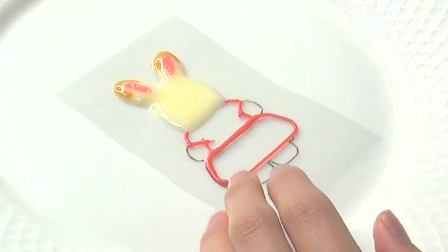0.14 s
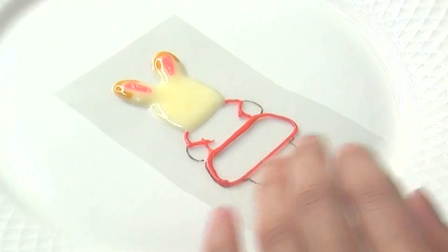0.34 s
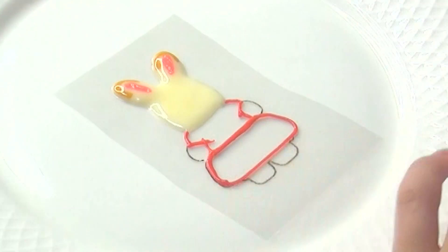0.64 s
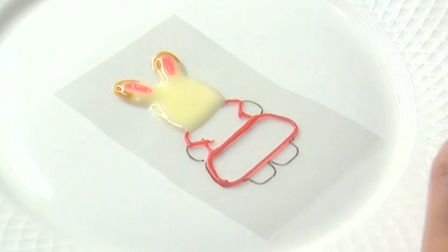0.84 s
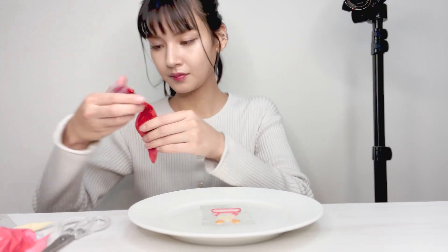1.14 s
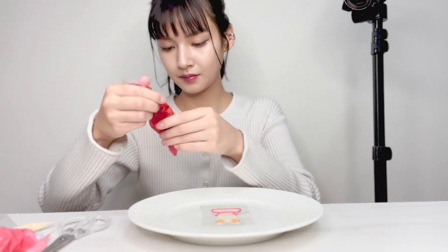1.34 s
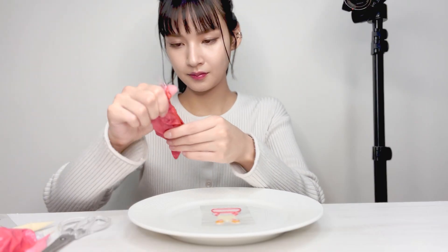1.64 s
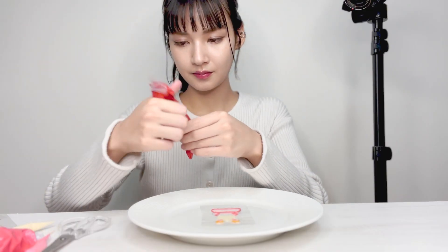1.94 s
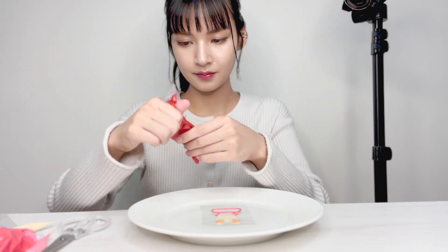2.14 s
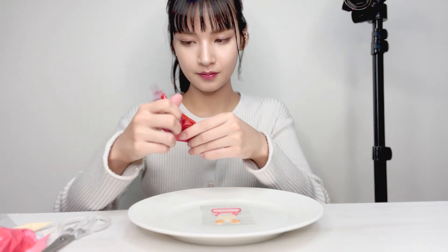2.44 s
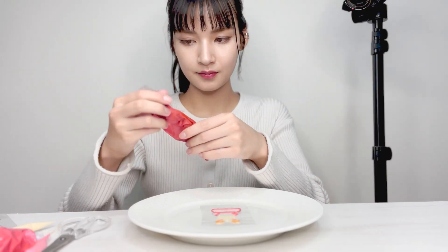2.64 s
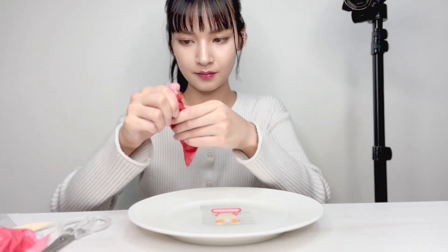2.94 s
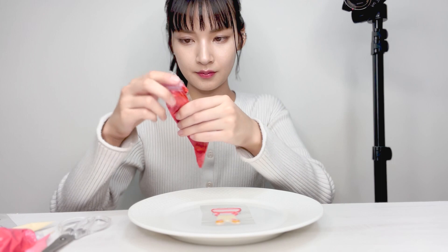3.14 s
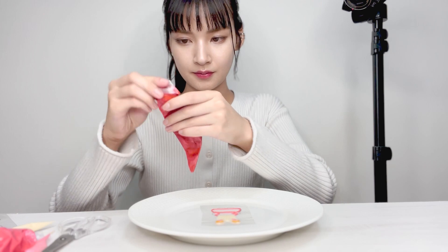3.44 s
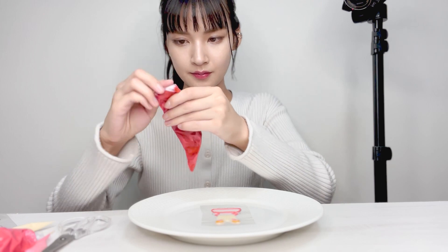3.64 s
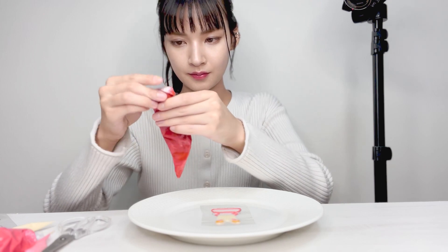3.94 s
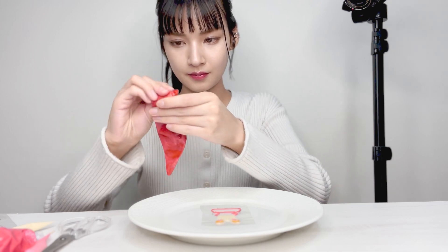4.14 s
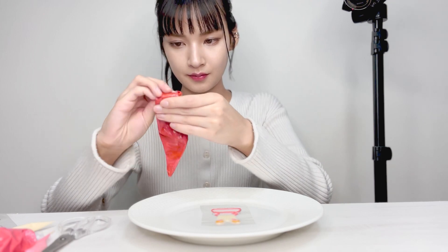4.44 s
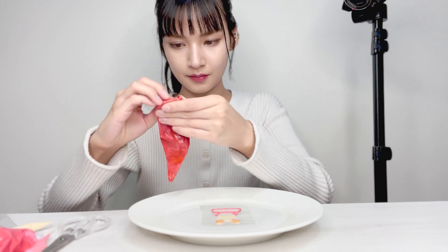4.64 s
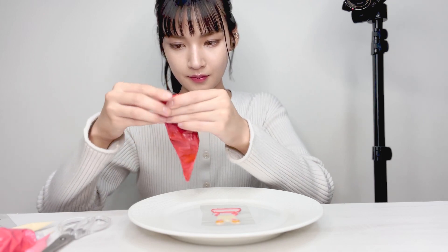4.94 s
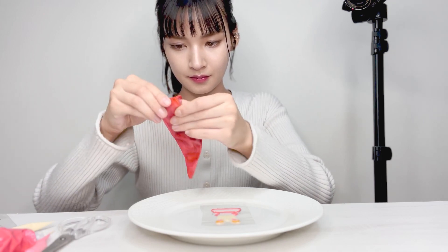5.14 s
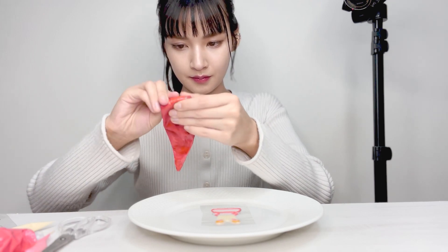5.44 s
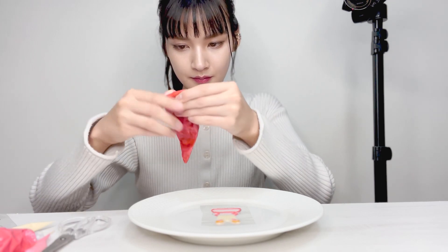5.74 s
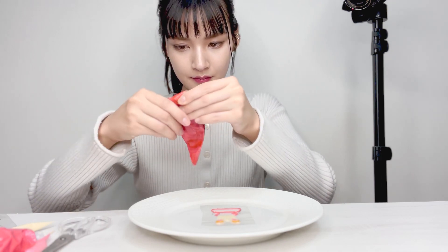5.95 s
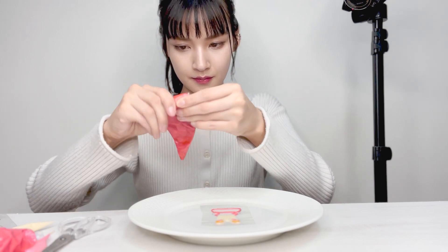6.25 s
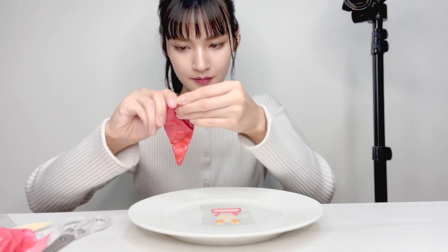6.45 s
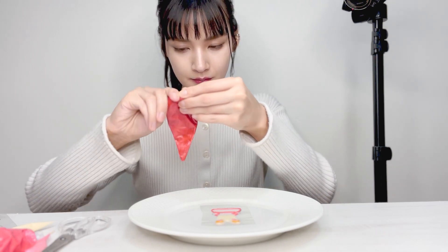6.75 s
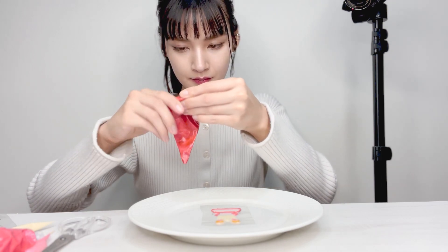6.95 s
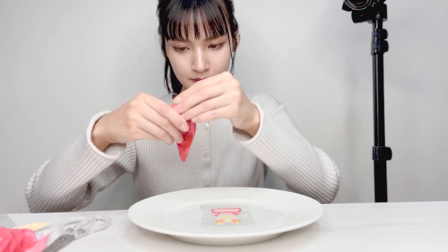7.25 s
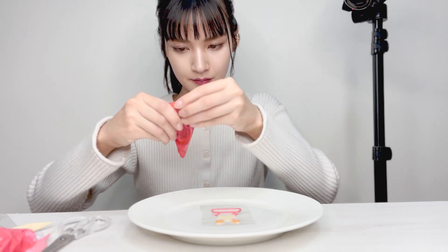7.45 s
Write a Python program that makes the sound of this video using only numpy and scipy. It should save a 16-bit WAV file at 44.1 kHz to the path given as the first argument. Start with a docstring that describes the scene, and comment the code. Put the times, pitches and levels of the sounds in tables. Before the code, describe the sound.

Hands twist and squeeze a filled plastic icing bag, its crisp, irregular crackles growing fainter over low room hum and hiss.

```python
"""A small, quiet room, a microphone pair near a table; hum and hiss lie under everything.
First an arm bumps the table, a sleeve rubs and a short low tone shudders. From about one second, hands
twist and squeeze a thin plastic piping bag above the table: creases in the film snap one by one over a
finer crackle, and the room answers each snap with a soft tail. The soft filling knocks dully now and
then. Over the last two seconds the snaps grow fainter."""
import sys
import numpy as np
from scipy import signal
from scipy.fft import rfft, irfft, next_fast_len
from scipy.io import wavfile

SR = 44100
rng = np.random.default_rng(int(sys.argv[2]) if len(sys.argv) > 2 else 0)


def pcm_store(signal):
    """Save signal as 16-bit PCM."""
    levels = np.round(np.clip(np.atleast_2d(signal), -1, 1) * 32767)
    wavfile.write(sys.argv[1], SR, levels.astype(np.int16).T)


N = 335071
SIZE = next_fast_len(N + SR)
HZ = np.arange(SIZE // 2 + 1) * SR / SIZE
TIME = np.arange(N) / SR


def from_db(db):
    """Gain of a level in dB."""
    return 10 ** (np.asarray(db) / 20)


def rms_one(x):
    """Scaled to rms 1."""
    return x / np.sqrt(np.mean(x ** 2) + 1e-20)


def in_time(rows):
    """Columns of a curve table at every sample."""
    times, *columns = np.transpose(rows)
    return [np.interp(TIME, times, column) for column in columns]


def at_hz(points, hz):
    """A table over frequency, read on a log axis."""
    frequencies, values = np.transpose(points)
    return np.interp(np.log(hz + 1), np.log(frequencies), values)


def ring(clicks, hz, t60):
    """A unit click sets a sine of height 1 ringing."""
    r, w = from_db(-60 / (t60 * SR)), 2 * np.pi * hz / SR
    return signal.lfilter([0, np.sin(w)], [1, -2 * r * np.cos(w), r * r], clicks + 1e-18)


def bandpass(x, edges_hz):
    """A gentle band-pass."""
    return signal.sosfilt(signal.butter(2, edges_hz, "band", fs=SR, output="sos"), x)


def resonance(hz, width_hz):
    """Spectrum of one peak of height 1."""
    return 1 / (1 + (2 * (HZ - hz) / width_hz) ** 2)


def wander(seconds):
    """A smooth random curve of rms 1."""
    r = np.exp(-1 / (seconds * SR))
    return rms_one(signal.lfilter([1], [1, -2 * r, r * r], rng.standard_normal(N)))


# Stereo width of the noise. Each row: frequency in Hz, likeness of the channels, 0 wide to 1 centred.
LIKENESS = [(25, 0.43), (60, 1), (150, 0.31), (400, 0.02), (5700, 0), (6800, 0.63), (9000, 1), (10800, 1),
            (12000, 1)]

def stereo_noise():
    """Left and right spectra of white noise, wide in the mids and centred in the treble."""
    mid, side = rfft(rng.standard_normal((2, SIZE)))
    alike = np.clip(at_hz(LIKENESS, HZ), 0, 1)
    return (np.sqrt(1 + alike) * mid + np.sqrt(1 - alike) * side * [[1], [-1]]) / np.sqrt(2)


# The empty room's hiss. Each row: frequency in Hz, relative level in dB.
HISS_COLOUR = [(20, -22), (40, -5), (60, -8.5), (110, -4.5), (150, -9), (300, -15.5), (500, -18.5),
               (1000, -25.5), (2000, -30.5), (4500, -35), (8000, -34), (10500, -38), (12600, -44),
               (13200, -71.5)]
# The room's low resonances. Each row: frequency in Hz, width in Hz, level in dB.
HUM = [(71.1, 26, -60.5), (83.4, 7.1, -59)]

def room_noise(hiss_db=-62):
    """Steady hiss, with a wavering hum where the room resonates."""
    hiss = from_db(hiss_db) * rms_one(irfft(stereo_noise() * from_db(at_hz(HISS_COLOUR, HZ)), SIZE))
    hum = sum(from_db(db) * rms_one(irfft(stereo_noise() * resonance(hz, width), SIZE))
              for hz, width, db in HUM)
    return (hiss + hum * from_db([[-1.1], [1.1]]))[:, :N]


# An arm meets the table. Each row: start in seconds, strength of the blow in dB.
ARM_BLOWS = [(0.034, -39.5), (0.049, -35), (0.061, -45.5)]
# The table's modes. Each row: frequency in Hz, gain in dB, seconds to fall 60 dB.
TABLE_MODES = [(91.6, -10.5, 0.53), (156, 1.5, 0.14), (258, -12.5, 0.054), (468, -21, 0.12),
               (855, -20, 0.11)]

def table_bumps():
    """Blows softened by flesh and cloth set the table ringing."""
    clicks = np.zeros(N)
    for start, db in ARM_BLOWS:
        clicks[round(start * SR)] = from_db(db)
    soft = bandpass(clicks, (60, 900))
    return sum(from_db(db) * ring(soft, hz, t60) for hz, db, t60 in TABLE_MODES)


# Creases snapping near the pair. Each row: time in seconds, direct peak in dB before panning, ring in Hz,
# levels of folds, pleats and wrinkles in dB against the ring, share spread all round in dB.
SNAPS = [(0.0902, -43.5, 8900, -3.5, -3, -9, -2.5), (1.1157, -35, 4100, -4, -7, -5, -3),
         (1.224, -35, 6000, -24, -30, -7, -0.5), (1.2362, -31.5, 7400, -17, -10, -10, 4.5),
         (1.251, -39.5, 1310, -6, -17, -4, -3), (1.2853, -19, 7000, -23, -13.5, -10, -6),
         (1.3035, -26, 5200, -24, -31, -18, -18), (1.33, -35, 8250, -30, -21, -19, -1.5),
         (1.379, -12, 6130, -20, -4, 3, -7), (1.397, -23, 6600, -22, -8, -8, -10.5),
         (1.4788, -28.5, 6900, -32, -5, -9, -7.5), (1.491, -26, 3720, -35, 15, 9.5, -8),
         (1.522, -27, 8750, -41, -3, -12, -7.5), (1.5528, -38, 5600, -23, -8, -12, -9),
         (1.568, -37, 6980, -20, -8, -12, -10.5), (1.579, -41, 2800, -15, -20, -25, -5.5),
         (1.5942, -25, 7300, -43, -8.5, -6.5, -7.5), (1.66, -18, 7250, -30, -1.5, -5, -10.5),
         (1.703, -24, 6600, -32, -7, -24, -8.5), (1.7859, -12, 7840, -13, -3, -5, -9),
         (1.7966, -22, 9200, -8, -29, 2, -11.5), (1.8478, -30, 9500, -0.5, -3, -24, -5),
         (1.8885, -40, 8050, -18, -10, -8, -11), (1.9577, -46, 6590, -15, -8, -12, -9),
         (2.0105, -38.5, 6900, -12, 1, -3, -2.5), (2.0412, -36.5, 3940, 4, 13, -13, -5),
         (2.046, -29, 6900, -16, -8, -2, -4), (2.0603, -35, 7320, -18, -7, -8, -10.5),
         (2.0799, -39.5, 2220, -2, -2, -3, 2), (2.1453, -35.5, 9000, 2, 2, 6, -7),
         (2.405, -43.5, 4240, -18, 13, 7, 4), (2.413, -41.5, 5270, -17, -8, -18, -7.5),
         (2.511, -26, 6170, -14.5, -3, -9, -5.5), (2.6235, -40.5, 4670, -25, -19, -4, -1),
         (2.6665, -33.5, 4070, -17, -10, -3, -2.5), (2.6768, -10.5, 4950, -36, -26, -15, -13),
         (2.7189, -19, 5200, -16.5, -3.5, 2, -4), (2.7273, -28, 4300, -7, -6, -1, -20),
         (2.732, -25, 5130, -9, -5, 1, -6.5), (2.7514, -33, 2850, -24, 2, -8, -1),
         (2.7864, -22, 5900, -34, -13, -6, -15), (2.7984, -23, 7000, -20, -5, -21, -10.5),
         (2.8225, -32, 5000, -7, -2, -21, -3.5), (2.8766, -29.5, 4830, -8.5, -9, -23, -2.5),
         (2.9095, -20, 6850, -51, -15, -19, -9.5), (2.9241, -24, 9400, -37, 4, -16, -7),
         (2.9925, -10, 7100, -55, -18, -0.5, -14), (3.0369, -27.5, 4220, -21, -17, -2, -4),
         (3.0417, -34, 6420, -17.5, -8, -8, -10.5), (3.0517, -34, 6590, -16, -8, -7.5, -8),
         (3.0633, -33, 7900, -35, -24, -3, -0.5), (3.0736, -31, 7320, -27, -6, -13.5, -9),
         (3.0969, -28.5, 6980, -21, -6, -9.5, -12.5), (3.092, -16.5, 7400, -43, -13.5, -5, -5.5),
         (3.114, -12, 6940, -21, -17, -13.5, -13), (3.133, -27.5, 7060, -1, 11.5, -3, -2.5),
         (3.1397, -21.5, 6970, -10, -19, -7, -24), (3.168, -20, 7560, -29, -4, -6, -11),
         (3.236, -13, 5810, -25, -10.5, -11, -8), (3.249, -26, 7200, -22, -22, -15, -7.5),
         (3.2727, -23, 7600, -24, -6.5, -19, -6.5), (3.2807, -33.5, 3650, 2, -7, -1, -0.5),
         (3.318, -34, 3880, -20, -8.5, -9, -8.5), (3.34, -8, 7330, -54, -19.5, -21, -15.5),
         (3.3594, -30.5, 6440, -8, -7, -3, -2.5), (3.3881, -20, 8000, -38, 3, -15, -7),
         (3.4173, -31, 9100, -38, -16, 22, 2), (3.431, -29.5, 8900, -22, -10, -8, -9),
         (3.5086, -32, 7540, -33, -14, -16, -7.5), (3.516, -22, 6600, -49, -12, -3, -18),
         (3.5214, -23, 7650, -43, 4, -16, -11), (3.534, -38, 8440, -26, -11, -8, -11),
         (3.61, -24, 7400, -47, 5, -3.5, -7), (3.6322, -40, 6590, -19, -8, -12, -9),
         (3.7003, -39, 5380, -18, -1, -8, -9), (3.7294, -40.5, 7200, -32, -23, 5, 8.5),
         (3.824, -40.5, 6840, -3, -12, -18, 5.5), (3.8308, -27.5, 8050, -35, -1, -4, -18.5),
         (3.88, -41, 7650, -14, 1, -13, 0), (3.887, -22, 7560, -17, -12, -14, -2.5),
         (3.9122, -19, 6600, -29, -20, -4, -7), (3.914, -16, 6000, -32, -32, -4, -10),
         (3.9143, -20, 4220, -13, -19, -3.5, -9), (3.9149, -31.5, 2110, -13, -41, -11, -2),
         (3.922, -34, 6800, -25, -15, -10, -16), (3.937, -36, 5500, -25, -14, -10, -16),
         (3.951, -35, 6150, -30, -25, -8, -10.5), (4.0008, -27, 6730, -38, -23, -26, -11.5),
         (4.018, -33, 6900, -20, 2, -9, -23), (4.0475, -33, 6700, -31, -13, -21, -5.5),
         (4.077, -36, 3970, -38, 5, -19, -3), (4.088, -31.5, 7260, -31, 0, -23, -8),
         (4.1295, -43, 7060, -22, -13, -12, -10), (4.1545, -21, 3320, -18, 8, -21, -7.5),
         (4.1637, -35, 3140, -15, -10, -30, -9), (4.2056, -26.5, 5610, -28, 1.5, -7, -5.5),
         (4.2674, -45, 9040, -18, -8, -3, -10), (4.4115, -30.5, 3780, -27, 5, -2.5, -6),
         (4.429, -23.5, 5930, -33, 2, 1, -4), (4.4584, -23, 6100, -8, -9, -19, -7),
         (4.4892, -34, 4200, -13, -14, 3, -1), (4.5185, -16, 6020, -35, -18, -23, -10.5),
         (4.5316, -31, 6630, -22, -5, -15, -11), (4.6406, -39.5, 4160, -8, 8, -21, -1),
         (4.6722, -37.5, 13200, -25, -16, -10, -6), (4.688, -23.5, 7200, -44, -5, -30, -13.5),
         (4.7269, -43, 6030, -18, -2, -15, -10), (4.7697, -34, 4900, -33, -6, -21, -7),
         (4.8006, -26.5, 9100, -31, -3, -28, -10), (4.876, -31, 4480, -16, 8, -1, -2.5),
         (4.881, -32, 4480, -19, -10, -14, -9), (4.8926, -32, 9400, -31, -18, 13, -1.5),
         (4.97, -37.5, 8200, -32, -13, -12, -10.5), (5.0415, -35, 2550, -3, 9, 9.5, -1.5),
         (5.064, -30.5, 6900, -15, -6, 0.5, -0.5), (5.0894, -33, 8790, -8, -4, -6, -9),
         (5.1052, -33, 4800, -10, -17, 2, 1), (5.168, -34, 2820, -3, 19, 2, -10),
         (5.2497, -44, 14200, -32, -4, 2, 2.5), (5.2779, -43, 4390, -15, -8, -12, -8.5),
         (5.445, -45, 4440, -1.5, 2, -27, -7), (5.535, -44, 7900, -23, -11, -8, -8),
         (5.617, -27, 8600, -40, -8.5, -16, -1.5), (5.6257, -26.5, 2850, -35, 3.5, 5.5, -9.5),
         (5.6882, -41, 4440, -17, -8, -8, -9.5), (5.8167, -50, 2580, -9, -7.5, -21, -8.5),
         (5.9265, -51, 6590, -11, -5, -20, -7.5), (6.212, -30, 7400, -37, -14.5, -14, -4),
         (6.224, -50, 2310, -22, -14, -17, 0.5), (6.2743, -39, 6540, -10, -6, -3, -3.5),
         (6.303, -45, 6500, -7, -4, -12, -6.5), (6.4795, -50, 7900, -31, -22, -18, 3),
         (6.5162, -51, 7620, -20, -14, -10, -6), (6.7235, -41, 7640, -22, -12, -19, -13),
         (6.8622, -36, 7170, -34, -6, 4.5, -3.5), (6.8717, -40, 7000, -21, -15, -9, -2.5),
         (6.9096, -33, 7600, -17, -7, 3, -3.5), (6.918, -42, 6500, -18, -7, -6, -3.5),
         (6.9245, -38, 2500, -10, -4, -7, -3), (6.939, -49, 6000, -15, -5, -10, -4.5),
         (6.962, -42.5, 3480, -10, -2, -12, -4), (6.984, -49, 2540, -9, -3, -19, -4),
         (7.0987, -46, 4230, -1, -1, -30, 0.5), (7.111, -56, 4000, -5.5, -2, -17.5, -3.5),
         (7.167, -50.5, 4500, -13, -4.5, -10, -4.5), (7.374, -46, 2300, 2, -20, -17, -9),
         (7.416, -41, 2500, 3, -10, -9.5, -2), (7.439, -39, 2500, 0, -12, -15, 0)]
# Where a snap sits from left to right. Each row: ring in Hz, left over right in dB.
SNAP_PAN = [(2000, -1), (3500, 2), (5200, 3.5), (6500, 0.5), (8000, 0.5)]
FOLDS_HZ, PLEATS_HZ, WRINKLES_HZ = (850, 2500), (2505, 5570), (8240, 13840)   # wide to finest creases

def crease_snaps(slip_s=.0018, lead_share=0.49, ragged_per_s=215, span=400):
    """A crease buckles in one jerk with a ragged aftermath; returns direct sound and the room's feed."""
    near, around = np.zeros((2, N + span)), np.zeros(N + span)
    t = np.arange(span) / SR
    for time, peak_db, hz, fold_db, pleat_db, wrinkle_db, spread_db in SNAPS:
        shared, per_side = rng.standard_normal(span), rng.standard_normal((2, span))
        pan_db = at_hz(SNAP_PAN, hz) + 2 * rng.standard_normal()
        length = slip_s * from_db(0.61 * spread_db)   # a broad fold gives way slowly, a tight one at once
        lead = min(lead_share * length, .002)
        slip = np.exp(-np.maximum((lead - t) / (lead_share * length), (t - lead) / length))
        jerk = np.arange(span) == round(lead * SR)
        burst = jerk + ragged_per_s * length * shared * slip
        facets = burst + 0.12 * per_side * slip   # each side faces the film differently
        # neighbouring bands swing in opposite senses, so they add where they meet
        folds = from_db(fold_db) * rms_one(bandpass(facets, FOLDS_HZ))
        pleats = -from_db(pleat_db) * rms_one(bandpass(facets, PLEATS_HZ))
        wrinkles = -from_db(wrinkle_db) * rms_one(bandpass((burst + facets) / 2, WRINKLES_HZ))
        sense = -1 if PLEATS_HZ[0] < hz < PLEATS_HZ[1] else 1   # the ring swings with the pleats when it lies among them, otherwise with the folds
        octaves = np.clip(0.52 + 0.005 * pleat_db, .08, .6)   # half breadth: weak pleats, purer snap
        wide_hz, tight_hz = [(hz / 2 ** o, min(hz * 2 ** o, .45 * SR)) for o in (octaves, 0.75 * octaves)]
        direct_ring = sense * rms_one(bandpass(bandpass(facets, tight_hz), tight_hz))
        spread_ring = sense * rms_one(bandpass(burst, wide_hz))   # all directions together: broader
        body = direct_ring + folds + pleats
        gain = from_db(peak_db) / abs(body + wrinkles).max()
        pan = from_db([[pan_db / 2], [-pan_db / 2]])
        at = round((time - lead) * SR)
        near[:, at:at + span] += gain * (pan * body + wrinkles)
        around[at:at + span] += gain * from_db(spread_db) * (spread_ring + (folds + pleats + wrinkles)[0])
    return near[:, :N], around[:N]


# Cloth sliding on the table. Each row: loudest moment in seconds, level in dB.
SLEEVE_RUBS = [(.106, -66.5), (.2, -83), (.3, -64.5)]

def sleeve(rise_db_per_s=190, fall_db_per_s=142):
    """A dull, faint rub of knitted cloth."""
    level = sum(from_db(db - np.maximum(rise_db_per_s * (time - TIME), fall_db_per_s * (TIME - time)))
                for time, db in SLEEVE_RUBS)
    rub = irfft(stereo_noise() / (1 + HZ / 500) * (HZ > 300), SIZE)[:, :N]
    return level * rms_one(rub)


# The low tone just after the bump. Each row: time in seconds, pitch in Hz, level in dB.
SHUDDER = [(.225, 225, -64), (.25, 231, -43.5), (.276, 224, -34), (.298, 218, -39), (.31, 199, -52.5),
           (.34, 185, -56)]

def shudder():
    """A brief, nearly pure low tone that sags as it stops."""
    hz, level_db = in_time(SHUDDER)
    sounding = (TIME > SHUDDER[0][0]) & (TIME < SHUDDER[-1][0])
    return np.sqrt(2) * from_db(level_db) * sounding * np.sin(2 * np.pi * np.cumsum(hz) / SR)


# Arms and hands moving above the table. Each row: time in seconds, level in dB.
RUSTLE_LEVEL = [(.9, -86), (1.2, -70), (1.5, -75), (1.75, -70), (2.0, -84), (7.2, -84), (7.44, -71),
                (7.6, -80)]
# The rustle's resonances. Each row: frequency in Hz, width in Hz, relative level in dB.
RUSTLE_PEAKS = [(230, 120, -3), (420, 200, -3)]

def arm_rustle(lump_db=3.0, lump_s=.02):
    """Moving arms and hands make a lumpy noise in two low resonances."""
    level_db, = in_time(RUSTLE_LEVEL)
    colour = sum(from_db(db) * resonance(hz, width) for hz, width, db in RUSTLE_PEAKS)
    level = from_db(level_db + lump_db * wander(lump_s))
    return level * rms_one(irfft(stereo_noise() * colour, SIZE)[:, :N])


def snap_wake(pitch_hz, wake_db=-14, rise_s=0.0038, fall_db_per_s=230.5, focus_db_per_octave=20):
    """A snap frees its neighbours: the crackle's power at one pitch jumps and dies away."""
    times, peak_db, hz, fold_db, pleat_db, wrinkle_db, spread_db = np.transpose(SNAPS)
    part_db = fold_db if pitch_hz < PLEATS_HZ[0] else wrinkle_db if pitch_hz > WRINKLES_HZ[0] else pleat_db
    near_ring = from_db(-focus_db_per_octave * abs(np.log2(pitch_hz / hz))) ** 2
    in_band = from_db(-4.5 + 0.47 * part_db) ** 2
    kicks = np.zeros(N)
    kicks[(times * SR).astype(int)] = (near_ring + in_band) * from_db(peak_db + spread_db + wake_db) ** 2
    fall, rise = from_db(-2 * fall_db_per_s / SR), np.exp(-1 / (rise_s * SR))
    return signal.lfilter([1 - rise], np.convolve([1, -fall], [1, -rise]), kicks + 1e-18)


# The bag's slow twisting. Each row: time in seconds, relative level in dB, dullness in dB per octave.
TWIST = [(1.0, -101, 14), (1.085, -60, 0), (1.11, -50.5, -1), (1.22, -47, -1.5), (1.3, -53, -4.5),
         (1.5, -57, 8), (1.75, -48.5, 3), (1.95, -65, 4), (2.05, -70, 6), (2.22, -65, 9), (2.35, -59, 4),
         (2.5, -69, -13.5), (2.62, -86, 4), (2.75, -70, 6), (3.05, -69.5, -14), (3.5, -61, -7.5),
         (3.9, -56, -8.5), (4.2, -65, 9), (4.35, -71, 3), (4.5, -60.5, 4), (4.85, -57, -1), (5.2, -67, 1),
         (5.37, -61.5, 4), (5.43, -73, 4), (5.58, -66, -3), (5.8, -67, 7), (6.0, -68, 2), (6.07, -68, 0),
         (6.11, -56, 0), (6.17, -66, 0), (6.4, -72, 9), (6.5, -67, 2), (6.55, -58, 1.5), (6.62, -67.5, 3.5),
         (6.78, -69, 5), (7.0, -63, 2.5), (7.3, -69, 10.5), (7.45, -62, -2), (7.6, -74, -2)]
# The colour of that twisting. Each row: frequency in Hz, gain in dB.
TWIST_COLOUR = [(700, -24), (1500, -45), (2500, -0.5), (4500, 0), (7000, 7.5), (10000, 4.5), (13000, -34.5),
                (16000, -13)]

def film_crackle(per_s=3000.0, size_db=7.0, clump_db=7, clump_s=.012, cycles=7.3, gain_db=-12.5):
    """Small wrinkles give way in random clusters, each ringing a few cycles at its own pitch."""
    sizes = from_db(size_db * np.minimum(rng.exponential(1, N), 2.8)) * rng.choice([-1, 1], N)
    rate = per_s * from_db(clump_db * wander(clump_s))
    gives_way = rng.random(N) < rate / SR
    clicks = rms_one(sizes * gives_way) * (TIME > TWIST[0][0])
    pitch_index = rng.integers(0, 16, N)
    level_db, dull_db = in_time(TWIST)
    out = np.zeros(N)
    for k, hz in enumerate(np.geomspace(800, 13000, 16)):
        twist = from_db(level_db + dull_db * np.log2(4000 / hz) + at_hz(TWIST_COLOUR, hz))
        grip = np.sqrt(snap_wake(hz) + twist ** 2)
        out += np.sqrt(hz / 4000) * ring(grip * clicks * (pitch_index == k), hz, cycles / hz)
    return from_db(gain_db) * bandpass(out, (900, 13500))   # thin film radiates no bass


# The filled bag knocking in the hands. Each row: start in seconds, level in dB, pitch in Hz.
THUDS = [(1.062, -58, 400), (1.116, -52, 800), (1.14, -58, 400), (1.673, -52, 500), (1.786, -42, 520),
         (1.81, -54, 450), (2.875, -50, 470), (3.235, -50, 750), (3.28, -51, 670), (7.374, -47, 950),
         (7.416, -46, 1250), (7.439, -43, 900)]

def filling_thuds(cycles=6.0, span=2000):
    """The soft filling rings only a few cycles."""
    out = np.zeros(N)
    for start, db, hz in THUDS:
        at = round(start * SR)
        out[at:at + span] += ring(from_db(db) * signal.unit_impulse(span), hz, cycles / hz)
    return out


# The small room's tail. Each row: frequency in Hz, seconds to fall 60 dB.
ROOM_T60 = [(300, 0.39), (1000, 0.12), (2500, 0.25), (6000, 0.33), (12000, 0.18)]
# Its colour at the microphones. Each row: frequency in Hz, gain in dB.
ROOM_COLOUR = [(300, 2.5), (1000, -1.5), (2000, 3), (3200, 2), (5000, 2), (8000, 3.5), (12000, -2),
               (16000, -6.5)]

def room_echoes(x, early=0.68, swell_s=0.011, poses=2, pose_s=.045):
    """Table and hands reflect at once, the walls' echoes thicken later; all die band by band."""
    noise, t = stereo_noise(), np.arange(SR) / SR
    tails, out = 0, 0
    for hz in 250 * 2. ** np.arange(7):
        octave = np.clip(1 - abs(np.log2((HZ + 1) / hz)), 0, 1)
        echoes = irfft(noise * octave, SIZE)[:, :poses * SR].reshape(2, poses, SR)
        tails += echoes * from_db(-60 * t / at_hz(ROOM_T60, hz))
    tails *= early * np.exp(-t / 0.008) + 1 - np.exp(-(t / swell_s) ** 2)
    tails /= np.sqrt(np.sum(tails ** 2) / (2 * poses))
    pose = TIME / pose_s
    for k in range(poses):   # the hands keep shifting, so the echoes fade from one pose to the next
        held = np.clip(1 - abs((pose - k + poses / 2) % poses - poses / 2), 0, 1)
        out += rfft(tails[:, k], SIZE) * rfft(x * np.sqrt(held), SIZE)
    return irfft(out * from_db(at_hz(ROOM_COLOUR, HZ)), SIZE)[:, :N]


def scene():
    """Bag and table reach the microphones directly and by way of the walls, over the room's noise."""
    snaps, snaps_around = crease_snaps()
    crackle, bumps, tone, thuds = film_crackle(), table_bumps(), shudder(), filling_thuds()
    slightly_right = from_db([[-1.2], [1.2]])
    direct = snaps + crackle + thuds + arm_rustle() + (bumps + tone) * slightly_right + sleeve()
    into_room = (from_db(-5) * bumps + from_db(-0.6) * snaps_around + from_db(-27) * tone
                 + from_db(-2.5) * crackle + from_db(-1) * thuds)
    return direct + room_echoes(into_room) + room_noise()


# Phase between the left and right channels. Each row: frequency in Hz, left's lead in radians.
CHANNEL_PHASE = [(0, 0), (400, -.2), (700, 1), (1300, 1), (4100, 3.1), (6500, 5.2), (9100, 3.14),
                 (12100, 0), (17000, -5.1)]

def record(dry):
    """The left channel leads in the mids and lags in the treble; the very top is cut."""
    half_lead = np.interp(HZ, *np.transpose(CHANNEL_PHASE)) / 2
    shifted = irfft(rfft(dry, SIZE) * np.exp(1j * half_lead * [[1], [-1]]), SIZE)[:, :N]
    stopband_hz = 17264
    return signal.sosfilt(signal.cheby2(12, 70, stopband_hz, fs=SR, output="sos"), shifted)


dry = scene()
out = record(dry)
pcm_store(out)
```